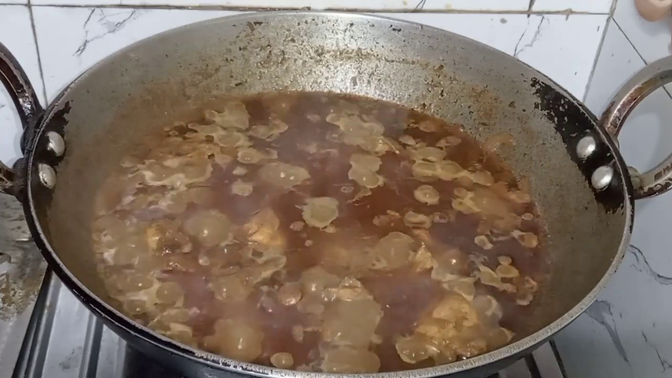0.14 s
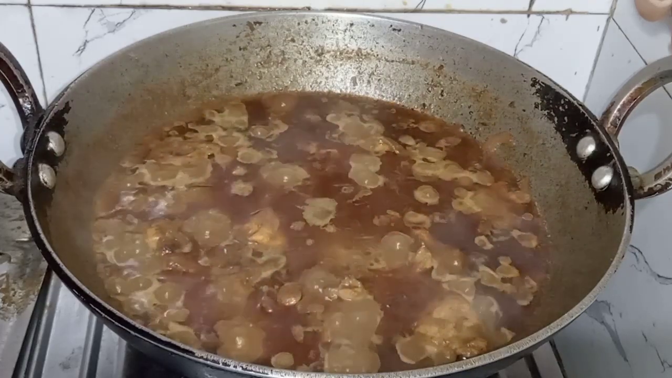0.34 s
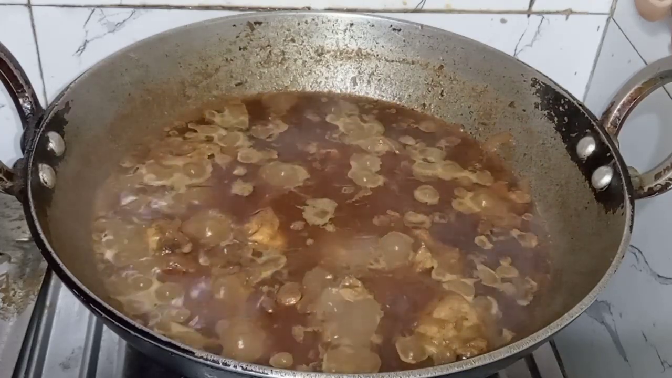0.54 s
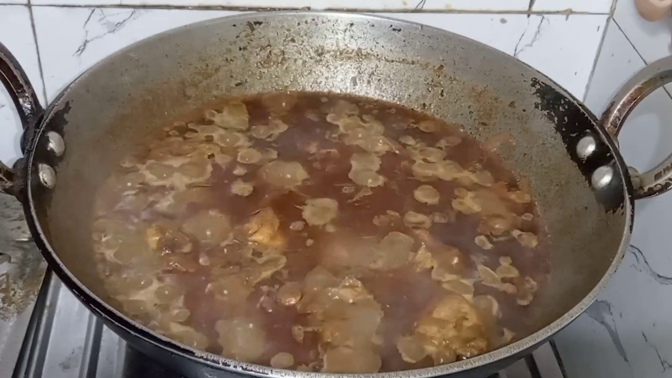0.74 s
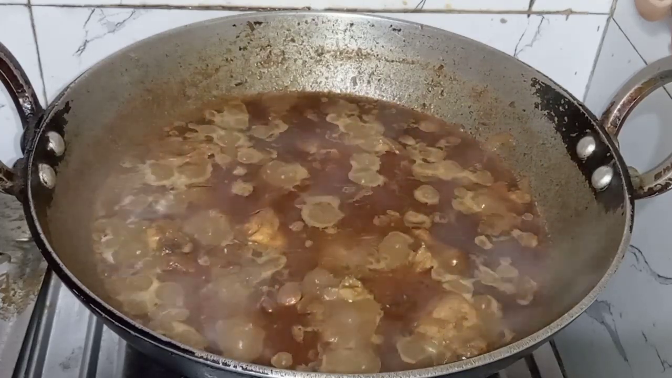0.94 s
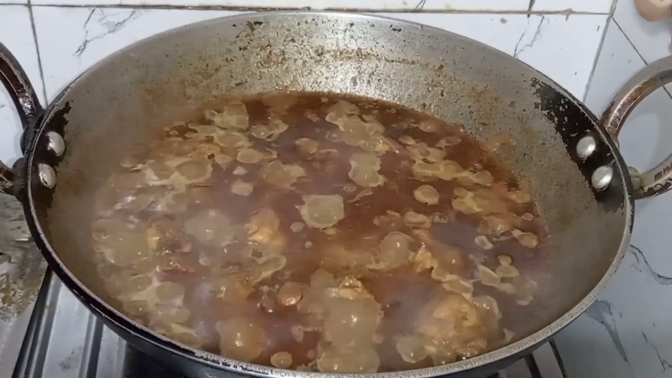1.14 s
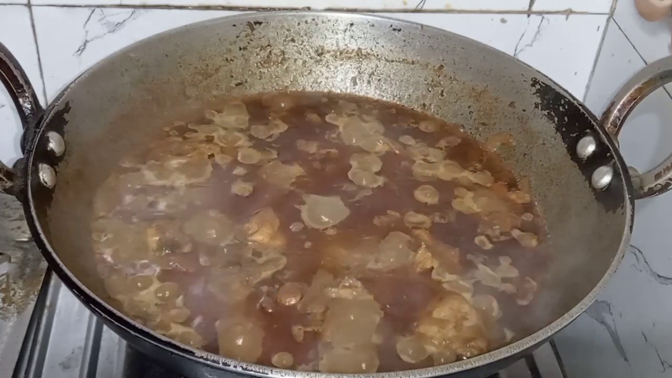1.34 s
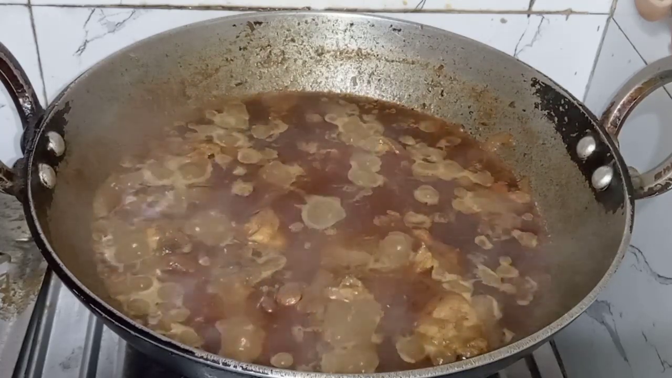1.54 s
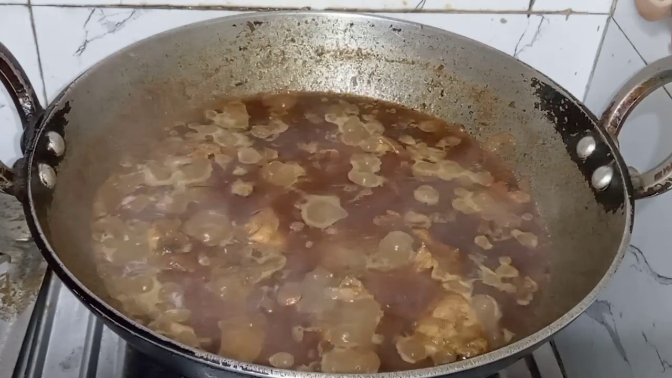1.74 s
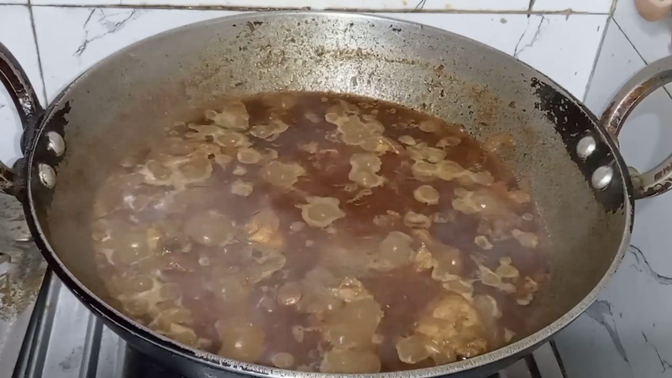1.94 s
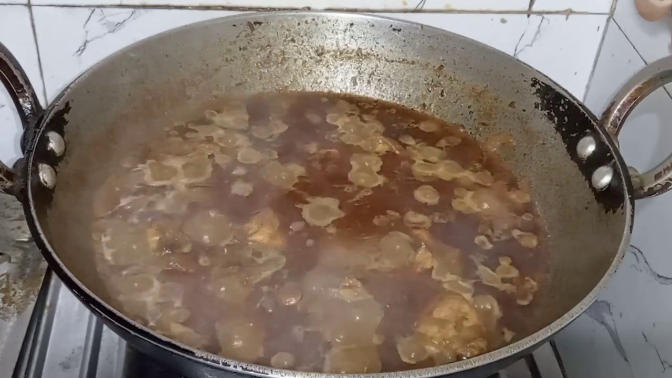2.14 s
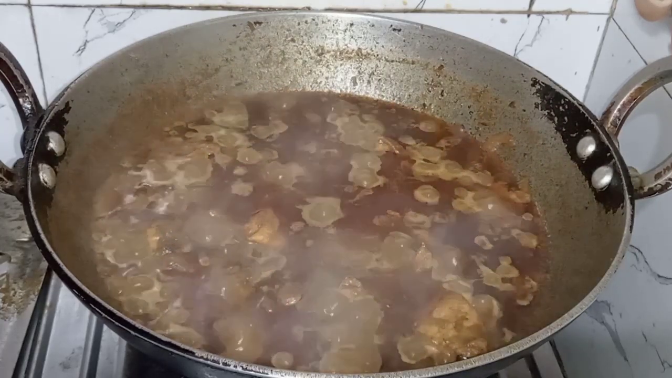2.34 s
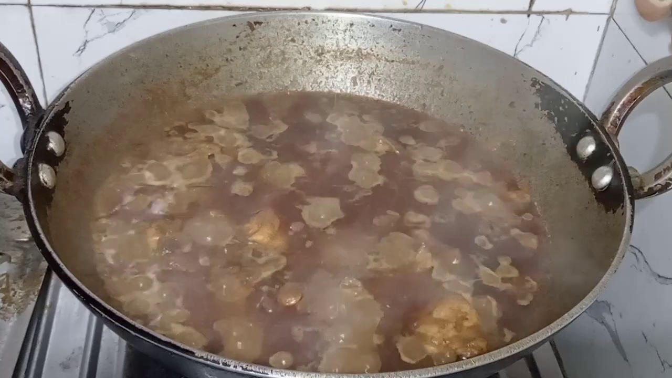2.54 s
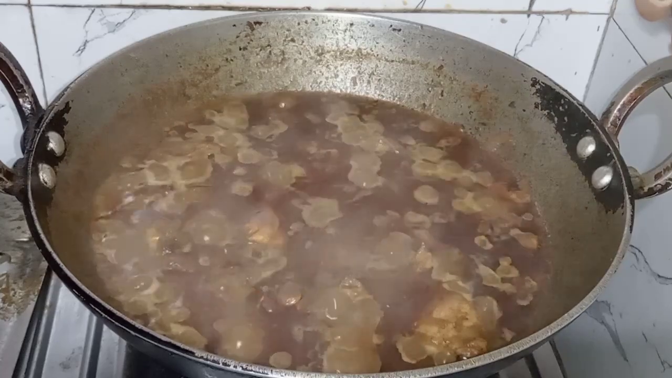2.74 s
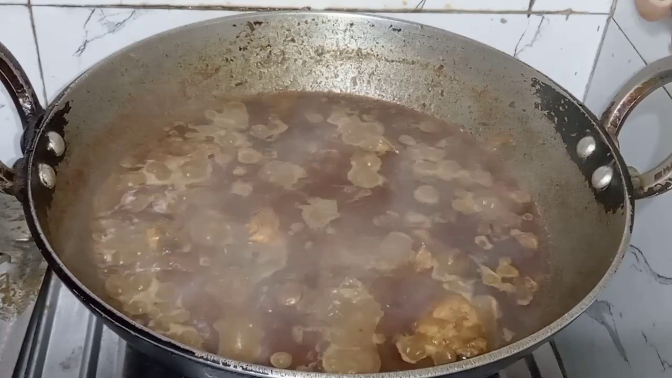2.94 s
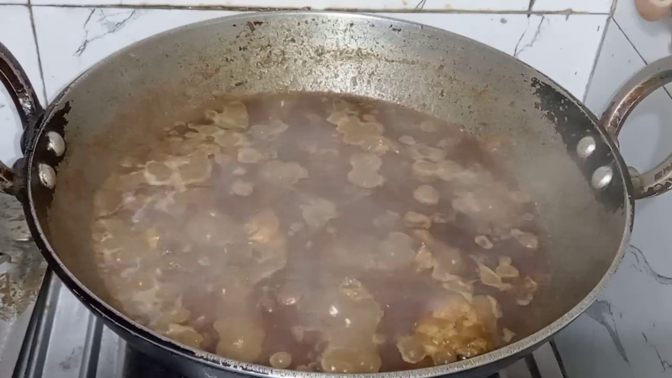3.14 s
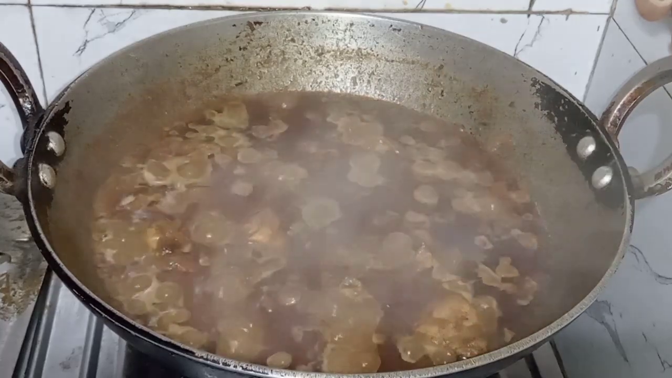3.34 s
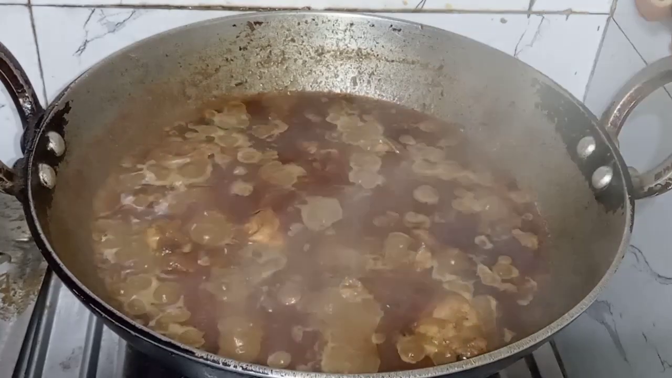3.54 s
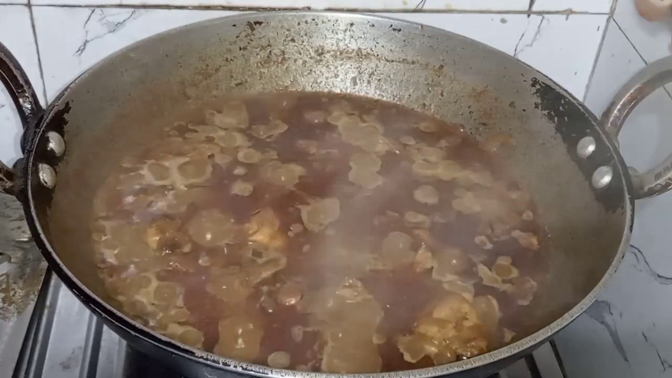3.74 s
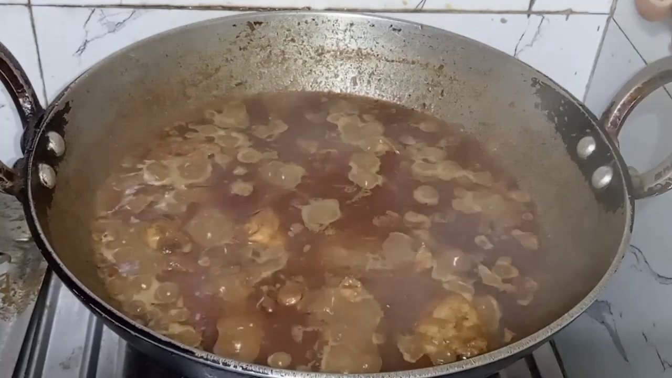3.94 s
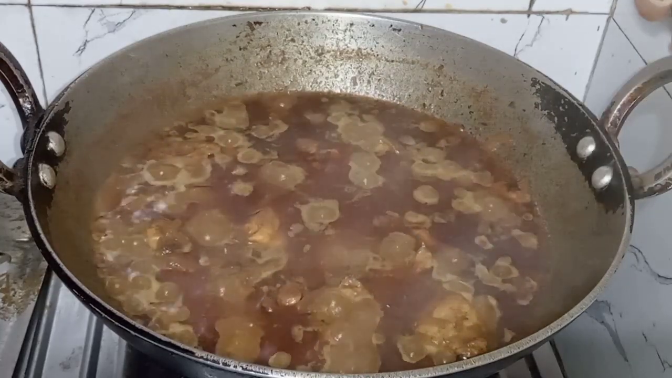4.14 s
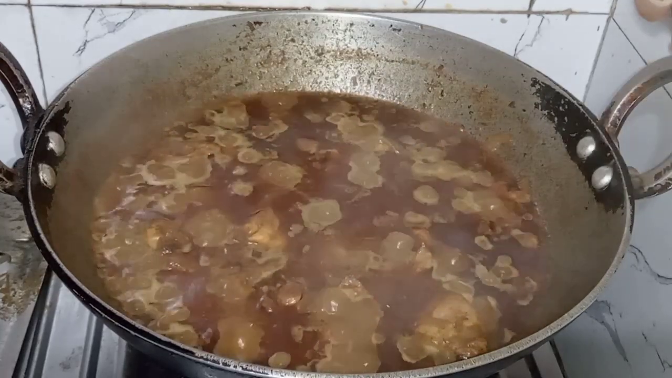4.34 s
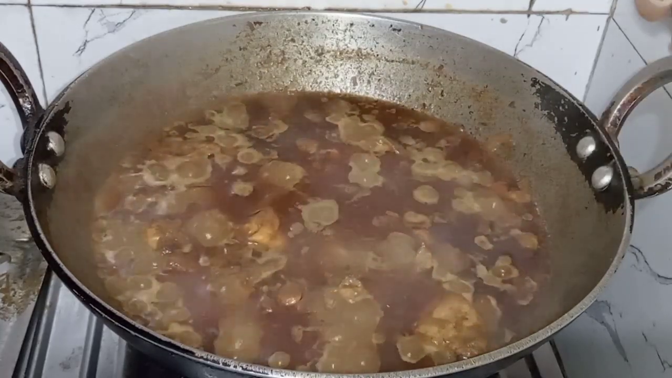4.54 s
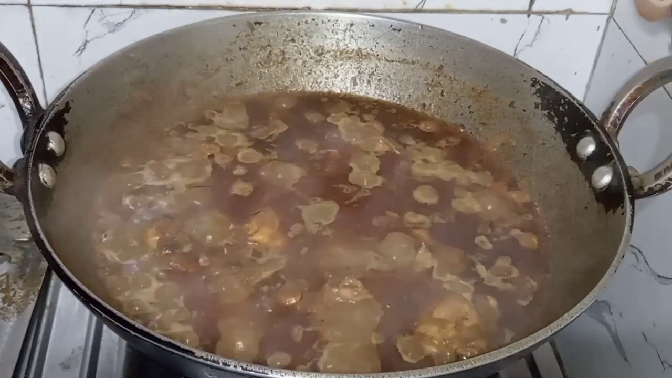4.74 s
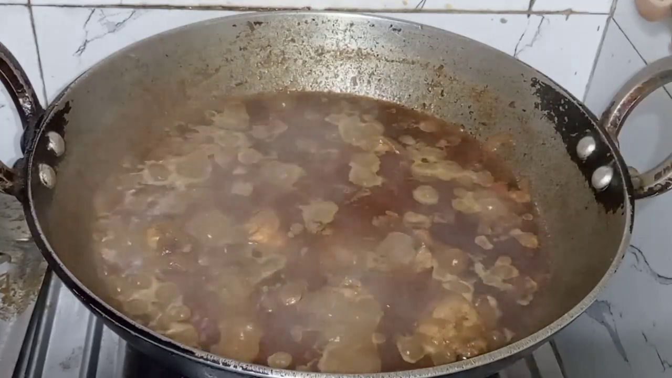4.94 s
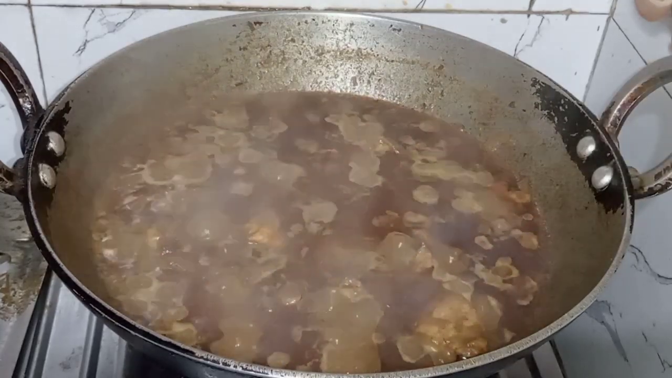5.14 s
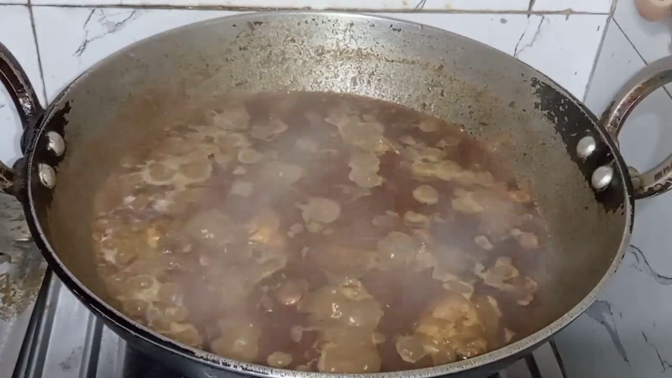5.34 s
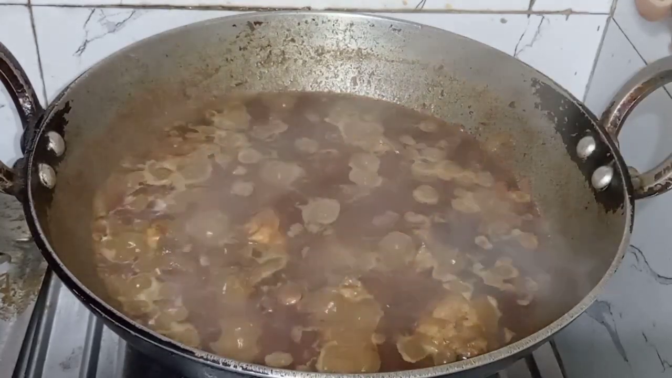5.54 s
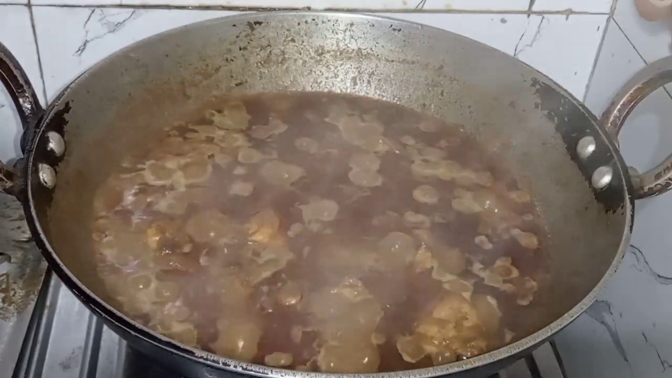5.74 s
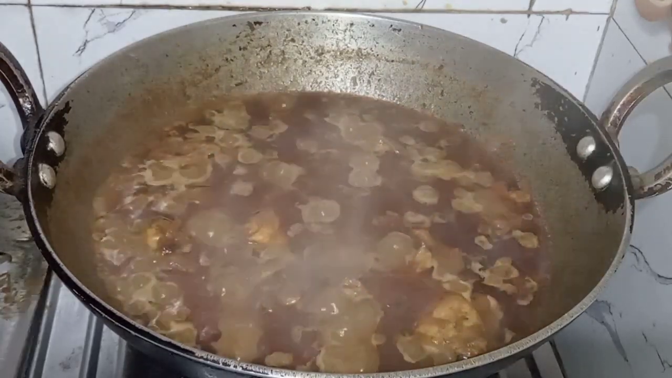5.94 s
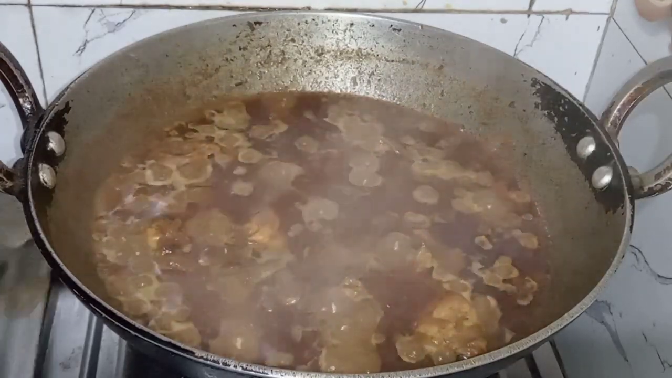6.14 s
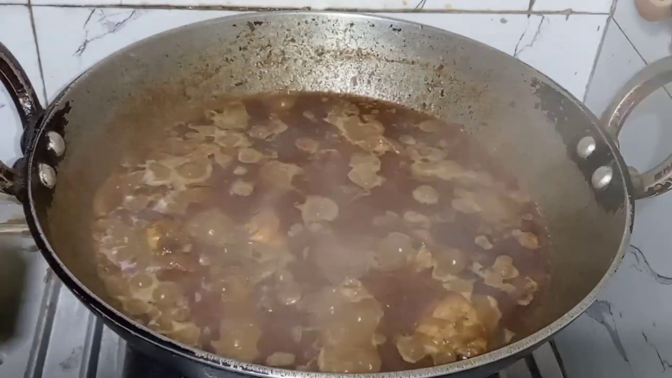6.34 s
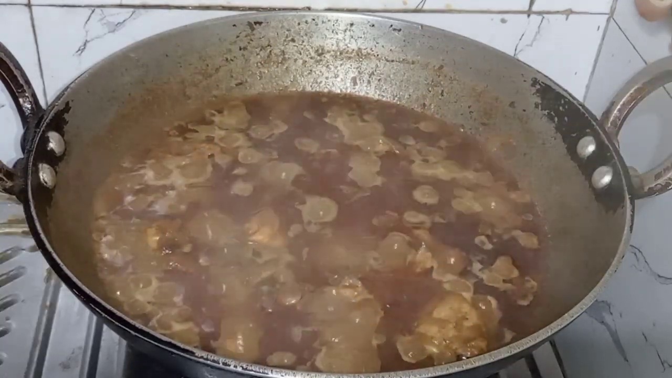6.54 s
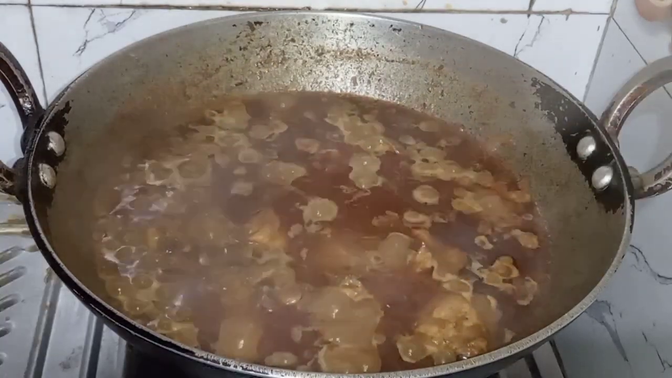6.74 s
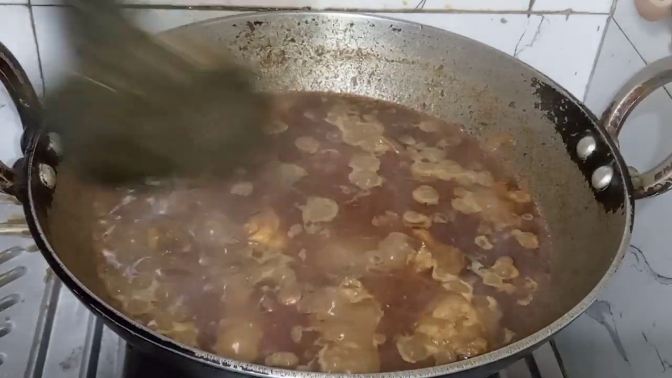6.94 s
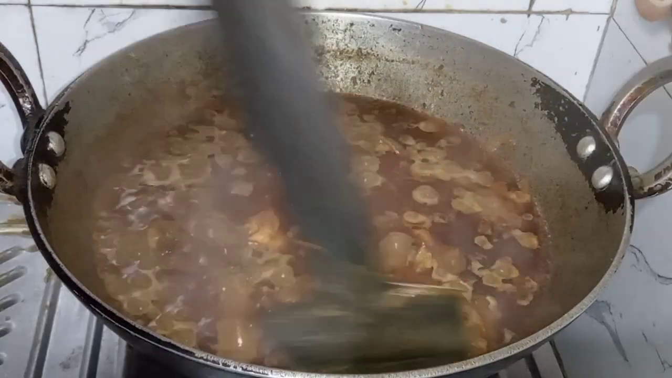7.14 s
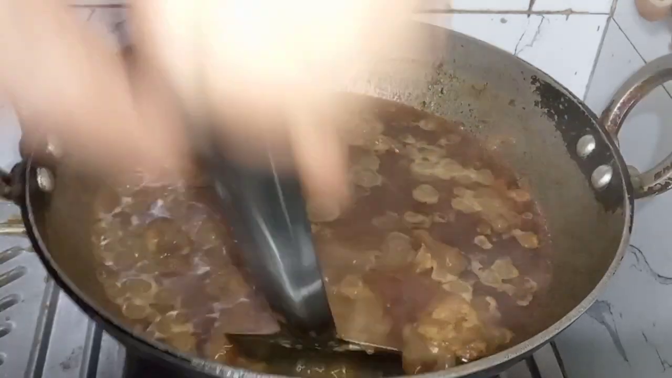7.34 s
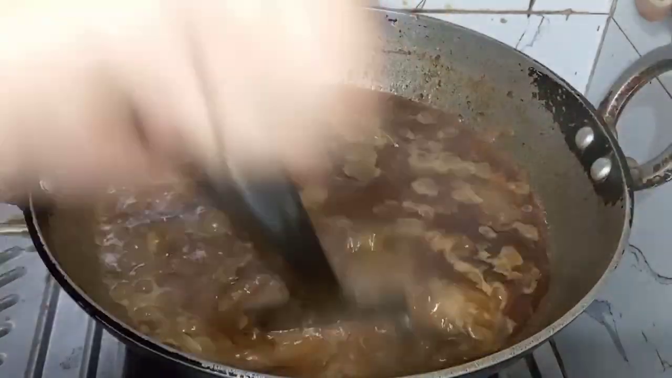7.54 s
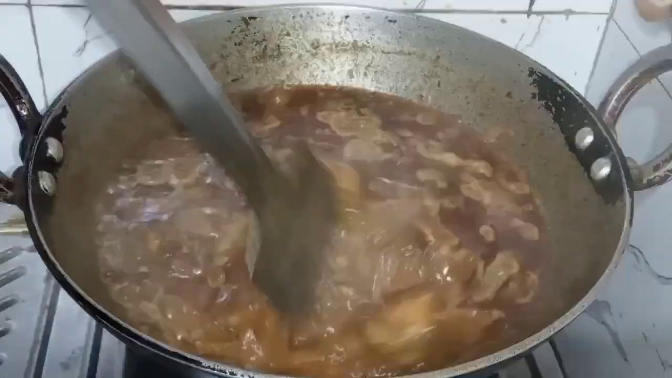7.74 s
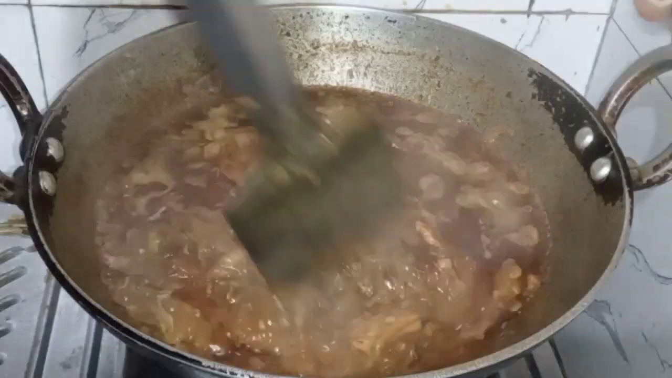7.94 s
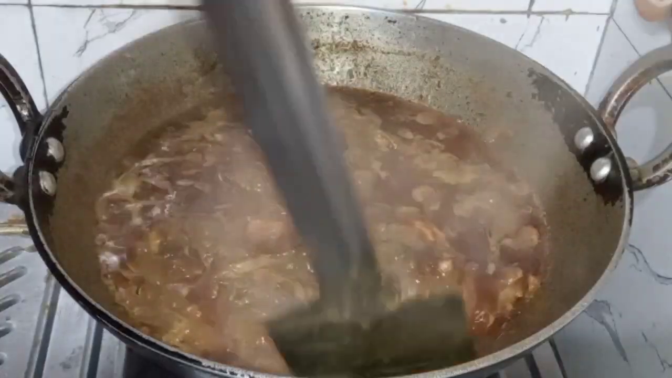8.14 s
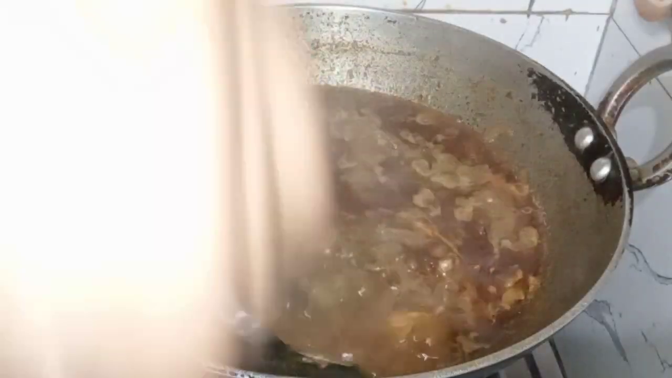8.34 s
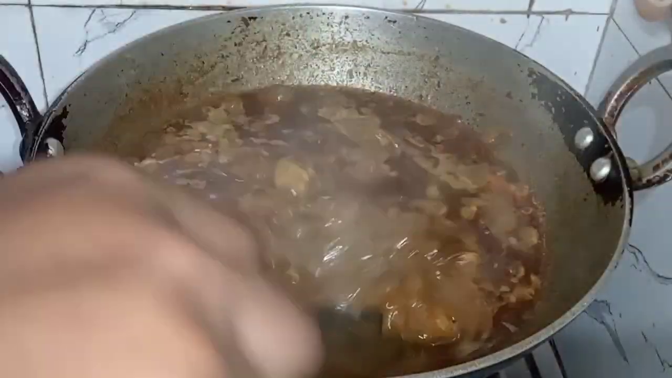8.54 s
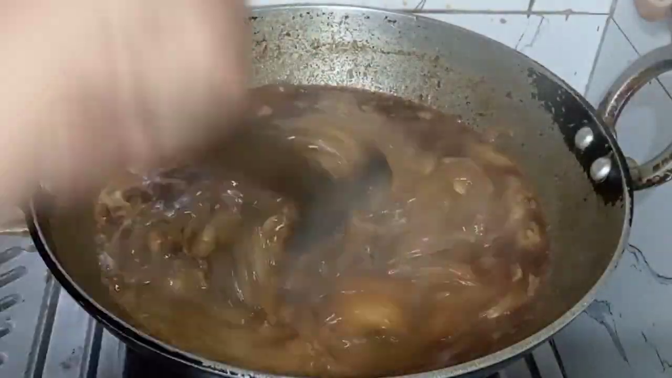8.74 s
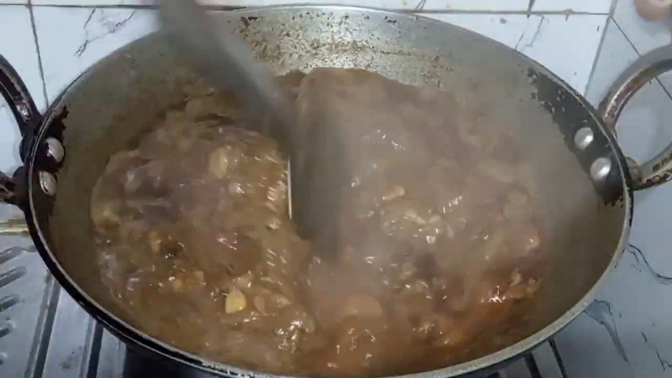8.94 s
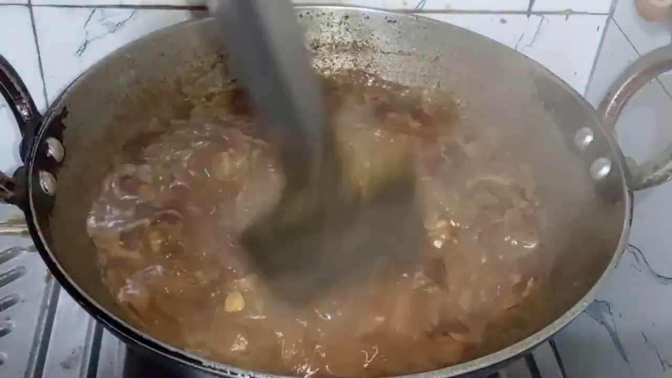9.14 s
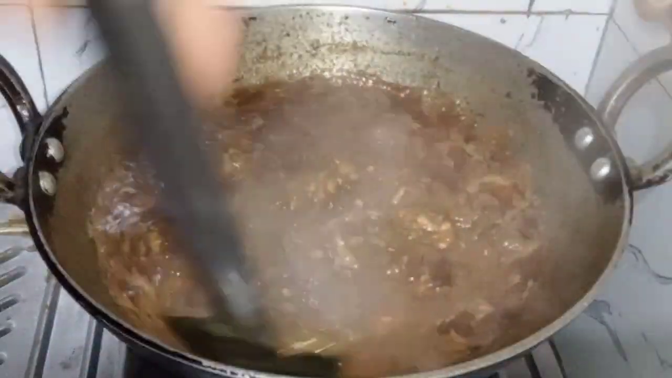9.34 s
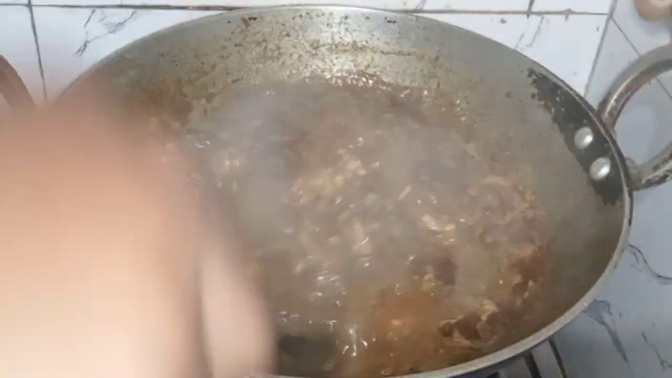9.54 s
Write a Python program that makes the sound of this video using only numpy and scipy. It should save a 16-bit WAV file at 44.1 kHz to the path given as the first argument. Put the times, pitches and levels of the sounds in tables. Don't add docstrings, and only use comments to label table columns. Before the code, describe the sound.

Thick gravy simmers with fizzing, popping bubbles over a low burner roar, a few knocks, then a metal spatula scrapes and sloshes through it.

```python
import sys
import numpy as np
from scipy import signal
from scipy.fft import rfft, irfft, next_fast_len
from scipy.io import wavfile
from scipy.ndimage import uniform_filter1d

SR = 44100
rng = np.random.default_rng(int(sys.argv[2]) if len(sys.argv) > 2 else 0)


def decibels_to_gain(level_db):
    exponent = np.asarray(level_db, float) / 20
    return 10 ** exponent


def wav_record(signal):
    frames = np.transpose(np.atleast_2d(signal))
    bounded = np.clip(frames, -1, 1)
    quanta = np.round(bounded * 32767).astype(np.int16)
    wavfile.write(sys.argv[1], SR, quanta)


N = 427769

# freq_hz [Hz], density_db [dB per Hz]
ROAR_SPECTRUM = [(25, -31), (48, -23.5), (62, -16.5), (95, 3.5), (130, -4), (220, -6.5), (330, -8),
                 (530, -9.5), (700, -14), (1200, -24), (1500, -21.5), (2300, -24), (2900, -15.5),
                 (5000, -73)]
# centre_s [s], lift_db [dB], half_length_s [s]
DRAUGHTS = [
    (6.13, 4, 0.23),
    (9.6, 5.5, 0.84),
]
# centre_s [s], lift_db [dB], half_length_s [s]
RUMBLE_GUSTS = [(.15, -8, .1), (1.3, 3, 0.1), (3.0, -22, 0.18), (3.4, 4, .12), (3.95, -6, .12),
                (4.4, 1, 0.13), (4.9, -6, 0.054), (5.3, 0, .08), (6.1, -2.5, 0.13), (6.7, 3.5, 0.28),
                (7.7, -12, 0.087), (9.1, -8.5, 0.17)]
# freq_hz [Hz], width_hz [Hz], lift_db [dB over surroundings]
PAN_RESONANCES = [(273.3, 23.5, 8), (819.7, 97, 15), (1090, 64, 18), (1460, 190, 10), (1717, 215, 7.5),
                  (2230, 54, 7), (2690, 38, 9), (3660, 270, -1)]

# freq_hz [Hz], density_db [dB per Hz]
FIZZ_SPECTRUM = [(1800, -38.5), (2400, -18.5), (2900, -15.5), (3300, -1.5), (4300, -8), (5900, 3),
                 (6800, 2), (7600, -5.5), (8500, -36)]
# start_s [s], peak_db [dB], pitch_hz [Hz]
TICKS = [(0.0138, -42, 6540), (0.0666, -45, 6270), (0.3741, -45, 5730), (0.3905, -38, 3700),
         (0.5356, -45, 4410), (0.7192, -47, 5050), (0.8249, -40.5, 6150), (1.066, -47, 3480),
         (1.2195, -41, 5100), (1.8651, -58, 6570), (2.114, -46, 3660), (2.1719, -48, 6600),
         (2.3275, -50, 3970), (2.6902, -47, 5770), (3.3702, -42, 5270), (3.4525, -48, 5100),
         (3.9459, -49, 4470), (4.1924, -45, 5430), (4.352, -42, 5770), (4.4951, -44, 6020),
         (4.6278, -43, 5480), (4.7266, -41, 6040), (4.8263, -45, 5400), (4.9939, -41, 5330),
         (5.4893, -40, 2880), (5.8949, -41, 5240), (6.0627, -43, 5860), (6.4761, -42, 6300),
         (6.8447, -41, 5800), (7.1166, -42, 5270), (7.128, -39, 6500), (7.138, -48, 3800),
         (0.043, -47, 5740), (0.101, -47, 6430), (0.189, -53, 4110), (0.2777, -47, 5330),
               (0.4728, -45, 5100), (0.6394, -47, 6160), (0.6918, -49, 6840), (0.9852, -47, 3480),
               (1.0216, -52, 5000), (2.2298, -48, 3670), (2.4069, -47, 4710), (2.807, -47, 4090),
               (3.5324, -44, 5930), (4.0594, -49, 4040), (4.133, -49, 5470), (4.2642, -45, 5610),
               (4.799, -49, 6060), (4.9034, -43, 5810), (4.9744, -53, 3600), (5.0719, -43, 5660),
               (5.1213, -46, 5630), (5.2273, -47, 6010), (5.2809, -46, 5870), (5.414, -49, 3830),
               (5.5358, -49, 5740), (5.6084, -46, 5650), (5.6344, -46, 4240), (6.0317, -48, 6300),
               (6.135, -42, 6350), (6.1938, -42, 5300), (6.395, -51, 6840), (6.4268, -46, 6090),
               (6.488, -43, 5320), (6.6403, -39.5, 6560), (6.9072, -50, 5480), (6.983, -46, 5800)]
# start_s [s], peak_db [dB], pitch_hz [Hz]
BLIPS = [(0.185, -40, 2160), (0.8949, -47, 1380), (1.0704, -38, 1460), (1.1272, -44, 2020),
         (1.426, -43.5, 2000), (1.626, -41, 1890), (2.7734, -44.5, 1450), (3.272, -44.5, 1560),
         (3.3796, -43, 1850), (3.46, -43, 1680), (4.128, -39, 1750), (4.688, -48, 1530),
         (4.8634, -38.5, 1670), (5.3009, -41.5, 1450), (5.6227, -44, 1750), (5.7437, -45, 1400),
         (5.9877, -44, 1390), (6.0561, -54, 1650), (6.766, -45, 1630), (6.9705, -44, 1430),
         (7.0636, -42, 1910),
         (0.0408, -47, 1560), (0.2994, -52, 1520), (0.623, -49, 1100), (1.2694, -53, 1500),
               (1.8851, -44, 1740), (2.2792, -49, 1610), (2.5538, -52, 1120), (2.9494, -54, 1550),
               (3.9594, -47, 1100), (4.02, -48, 1150), (4.1759, -48, 1400), (4.3984, -53, 1740),
               (4.7636, -46, 1340), (5.0549, -52, 1570), (5.199, -49, 1100), (5.4094, -51, 1630),
               (5.5857, -49, 1710), (5.8396, -53, 1130), (6.3744, -47, 1710), (6.6084, -51, 1170),
               (7.0494, -47, 1770)]
# centre_s [s], share [0-1], half_length_s [s]
LULLS = [(1.5, 0.05, .1), (1.85, 0.5, .08), (2.5, 0.06, 0.19), (3.0, 0.34, 0.25), (3.45, 0, 0.11),
         (4.14, 0.47, 0.061), (4.3, .7, 0.056), (4.6, 0.5, 0.23), (4.92, 0.3, 0.072), (5.12, 0.5, 0.081),
         (5.28, 0.4, .06), (5.75, 0.27, 0.13), (6.05, 0.04, 0.054), (6.5, 0.2, .12), (6.8, 0.44, 0.12)]

# start_s [s], rattle_db [dB], rise_s [s], rattle_length_s [s]
KNOCKS = [
    (1.691, -42, 0.0036, 0.048),
    (1.997, -45, 0.0045, 0.062),
    (3.559, -27.5, 0.0088, 0.073),
    (6.222, -33, 0.002, 0.0074),
    (7.162, -27.5, 0.0016, 0.008),
    (9.279, -38, 0.00051, 0.0011),
]
# crack_db [dB re rattle], ring_db [dB re rattle], t60_s [s], looseness [0-1]
STRUCK_THINGS = [
    (11, 9, 0.77, 0.6),
    (0, 5.5, 0.26, 0.46),
    (-4.5, -0.3, 0.61, 0.45),
    (1, 4, 0.48, 0.36),
    (-4, 0, 0.61, 0.57),
    (7.5, 5.5, 0.85, 0.2),
]
# freq_hz [Hz], density_db [dB per Hz]
KNOCK_SPECTRA = [
    [(80, -18), (330, -7.5), (900, -7.5), (1250, -20), (1700, -12), (2680, -15.5), (2850, -25),
     (7500, -33.5)],
    [(100, 11), (300, -5), (950, -2), (1600, -12.5), (3000, -23), (7500, -25)],
    [(100, -16), (420, -14), (1030, 0.5), (1740, -7), (2500, -4.5), (4400, -12.5), (5000, -22.5),
     (8000, -36)],
    [(100, -30), (430, -6), (850, -14.5), (1300, -15.5), (3500, -16.5), (8000, -24.5)],
    [(200, -18), (700, -22), (1700, -15), (3400, -15.5), (5300, -5), (7500, -10.5), (8600, -23)],
    [(200, 1), (400, -12), (1000, -9), (1800, -13), (4000, -8.5), (7200, -9.5), (8600, -27)],
]
# freq_hz [Hz], level_db [dB], t60_s [s]
KITCHEN_MODES = [
    [(117, -17, 1.2), (323, -5, .22), (408, -14, .4), (482, -7, .15), (590, -12, .2), (703, -12, .25),
     (949, -1, .22), (955, -12, .7), (1040, -15, .2), (1750, -15, .2), (2520, -13, .07)],
    [(119, 3, 1.3), (107, -7, .7), (190, -7, .6), (320, -13, .3), (493, -10, .3), (544, -15, .3)],
    [(412, -14, .85), (440, -11, .5), (542, -14, .7), (845, -13, .5), (980, -9, .3), (1058, -8, 1.0),
     (1080, -9, 1.1), (1142, -9, .7), (322, -15, .9), (1590, -11, .3), (2412, -4, .3), (2433, -4, .28),
     (2422, -18, 1.2), (2885, -14, .4), (4506, -17, .23)],
]
# freq_hz [Hz], level_db [dB], t60_s [s]
UTENSIL_MODES = [
    [(182, -12, .3), (256, -8, .35), (338, -9, .25), (420, -6, .25), (2940, -13, .2), (805, 0, .2),
     (900, 3, .13), (2090, -12, .2), (2600, -9, .1), (3450, -10, .12), (4400, -15, .2), (4840, -11, .15),
     (6000, -17, .25)],
    [(1190, -10, .12), (1631, -17, .15), (2110, -14, .1), (2700, -8, .06), (4646, -12, .2),
     (4980, -10, .19), (5398, -6, .17), (5424, -10, .35), (5593, -12, .25), (6261, -6, .2), (6869, -12, .2)],
    [(1090, -8, .2), (2492, -3, .1), (4800, -3, .08), (5500, -9, .08), (6500, -8, .12), (7160, -1, .12)],
]
# start_s [s], level_db [dB], rise_s [s], pitch_hz [Hz], t60_s [s]
BOUNCES = [(3.596, -37, 0.0086, 5550, 0.3), (1.733, -42, 0.0089, 925, 0.15),
           (7.167, -23, .001, 5560, 0.033), (3.568, -31, .001, 2380, 0.041), (9.3, -41.5, .004, 1020, 0.15),
           (9.316, -44, .003, 4570, .06), (6.053, -50, 0.0054, 870, 0.11), (6.056, -49, .005, 260, .15),
           (6.085, -45, .005, 248, 0.11), (6.133, -55.5, .005, 930, 0.13), (6.135, -44, 0.0065, 246, 0.16),
           (6.163, -56, .004, 910, .1), (6.198, -48, .004, 910, 0.084), (7.28, -44, .004, 583, 0.07),
           (7.462, -38.5, .006, 260, 0.16), (8.897, -40.5, 0.0022, 5200, 0.093)]

# start_s [s], length_s [s], scrape_db [dB], sizzle_db [dB], sizzle_length_s [s]
STROKES = [
    (7.296, .4, -43, -43.5, .25),
    (8.244, .5, -42, -45, .48),
    (9.342, .4, -43, -45, .4),
]
# start_s [s], knock_db [dB], splash_db [dB re knock], splash_hz [Hz], t60_s [s]
CATCHES = [(7.391, -32, -1.5, 2930, 0.12), (7.644, -30.5, -4.5, 6360, 0.052),
           (7.729, -35.5, -3.5, 3080, 0.43), (7.794, -33, -3.5, 3800, 0.17), (7.871, -33.5, -4, 3760, 0.14),
           (7.908, -37, 1.5, 3700, 0.094), (8.009, -58, 22, 6700, 0.067), (7.791, -59, 19, 6600, .1),
           (7.996, -39, -4, 3000, .06), (8.008, -32, 0.5, 3580, 0.12), (7.325, -36.5, -14, 2500, 0.12),
           (8.314, -30.5, -20, 2400, .1), (8.365, -30, -18, 3000, .06), (8.585, -29, -11, 3000, 0.099),
           (8.084, -42, 0, 5000, 0.041), (8.139, -22.5, -9, 2870, 0.038), (8.157, -30.5, -5.5, 2840, 0.12),
           (8.27, -32.5, -22, 6400, 0.067), (8.381, -18.5, -21, 5250, 0.089), (8.403, -34, -26, 2670, 0.1),
           (8.504, -26.5, -11, 4350, 0.063), (8.604, -24, -12, 3010, 0.15),
           (8.752, -54.5, 24.5, 5500, 0.05), (8.883, -45.5, 12.5, 3380, 0.078),
           (8.93, -29, -8.5, 3270, 0.04), (9.06, -33.5, -1.5, 3300, 0.12), (9.166, -51, 3, 3100, 0.098),
           (9.177, -31.5, -6, 3520, 0.14), (9.226, -33.5, -7, 3200, 0.13), (9.453, -31, -2, 3520, 0.12)]
# freq_hz [Hz], density_db [dB per Hz]
EDGE_SPECTRUM = [(500, -24), (900, 0.5), (1400, -4), (1850, 0), (2400, -4.5), (3200, -29)]
# freq_hz [Hz], density_db [dB per Hz]
SLIP_SPECTRUM = [(450, -24), (700, 8.5), (1650, 3.5), (1810, 12), (1980, 8.0), (2300, 10.0), (3000, -47.0)]
# freq_hz [Hz], density_db [dB per Hz]
SIZZLE_SPECTRUM = [(1180, -33.5), (2000, -23), (2430, -9.5), (3790, -5.5), (5000, -11.5), (6490, -5.5),
                   (7540, -14.5), (8460, -23.5), (11000, -73.5), (18600, -120)]
# freq_hz [Hz], density_db [dB per Hz]
SLOSH_SPECTRUM = [(29, -51), (50, -32.5), (114, -5), (248, 0), (324, -7.5), (613, -5.5), (800, -13),
                  (1040, -18.5), (1760, -120)]
# centre_s [s], lift_db [dB], half_length_s [s]
SURGES = [
    (7.48, 11, 0.13),
    (8.18, 11.5, 0.047),
    (8.4, 10.5, 0.16),
    (8.6, -11.5, 0.18),
    (9.0, 5, 0.39),
    (9.6, 7, 0.17),
]


def evened(x):
    return x / np.sqrt(np.mean(x ** 2) + 1e-20)


def add(mix, start_s, sound):
    part = mix[round(start_s * SR):][:len(sound)]
    part += sound[:len(part)]


def coloured(x, spectrum, pan=0.):
    hz = abs(np.fft.fftfreq(8192, 1 / SR))
    points_hz, points_db = np.transpose(spectrum)
    db = np.interp(np.log(hz + 1), np.log(points_hz), points_db, left=-60, right=-80)
    for mode_hz, width_hz, lift_db in PAN_RESONANCES:
        db = db + pan * lift_db / (1 + (2 * (hz - mode_hz) / width_hz) ** 2)
    log_gain = np.log(decibels_to_gain(np.maximum(db, -100)))
    response = np.exp(np.conj(signal.hilbert(log_gain)))
    taps = np.fft.ifft(response).real[:4096]
    return evened(signal.oaconvolve(x, taps)[:len(x)])


def resonate(x, hz, width_hz):
    turn = np.exp(2j * np.pi * np.cumsum(hz * np.ones(len(x))) / SR)
    pole = np.exp(-np.pi * width_hz / SR)
    smooth = signal.lfilter([1 - pole], [1, -pole], x / turn)
    return 2 * (turn * smooth).real


def wander(rate_hz, size=N):
    padded = next_fast_len(size)
    hz = np.fft.rfftfreq(padded, 1 / SR)
    spectrum = rfft(rng.standard_normal(padded)) / (1 + (hz / rate_hz) ** 2)
    return evened(irfft(spectrum, padded)[:size])


def clicks(per_s, spread_db):
    size = decibels_to_gain(spread_db * np.minimum(rng.exponential(1, N), 4))
    sign = np.sign(rng.random(N) - .5)
    return size * sign * (rng.random(N) < per_s / SR)


def patchy(x, patch_db, frames=16, bins=8):
    z = signal.stft(x, nperseg=512, noverlap=384)[2]
    field = rng.standard_normal(z.shape)
    for _ in range(2):
        field = uniform_filter1d(field, bins, 0, mode="wrap")
        field = uniform_filter1d(field, frames, 1, mode="wrap")
    z = z * decibels_to_gain(patch_db * evened(field))
    return evened(signal.istft(z, nperseg=512, noverlap=384)[1][:N])


def swells(rows):
    t = np.arange(N) / SR
    return sum(lift * np.exp(-((t - centre_s) / half_s) ** 2) for centre_s, lift, half_s in rows)


def surroundings(x, t60_s, wet_db, gap_s=0.0022):
    t = np.arange(round(.25 * SR)) / SR
    tail = rng.standard_normal(len(t)) * decibels_to_gain(-60 * t / t60_s) * (t > gap_s)
    return x + decibels_to_gain(wet_db) * signal.oaconvolve(x, tail / np.linalg.norm(tail))[:N]


def burner():
    roar = coloured(rng.standard_normal(N) * decibels_to_gain(1.5 * wander(34)), ROAR_SPECTRUM, pan=0.87)
    roar = patchy(roar, patch_db=1.5)
    rumble = resonate(roar, hz=100, width_hz=91)
    roar = roar + (decibels_to_gain(swells(RUMBLE_GUSTS)) - 1) * rumble
    hum_hz, hum_width_hz, hum_db, roar_db = 98.4, 7.6, -70, -54
    hum = resonate(rng.standard_normal(N), hum_hz, hum_width_hz)
    hum = evened(resonate(hum, hum_hz, hum_width_hz))
    return decibels_to_gain(roar_db + swells(DRAUGHTS)) * roar + decibels_to_gain(hum_db) * hum


def bubble(hz, turns, glide):
    u = np.arange(round(5 * turns / hz * SR)) / SR * hz / turns
    tone = np.sin(2 * np.pi * turns * (u + glide * u ** 2 / 2))
    return tone * np.exp(-u) * (1 - np.exp(-8 * u))


def swarm(low_hz, high_hz, per_s, spread_db, turns, glide, count=9):
    train = clicks(per_s, spread_db)
    size = rng.integers(0, count, N)
    out = np.zeros(N)
    for k, hz in enumerate(np.geomspace(low_hz, high_hz, count)):
        out += signal.oaconvolve(train * (size == k), bubble(hz, turns, glide))[:N]
    return evened(out)


def simmer():
    crackle = evened(clicks(1200 * decibels_to_gain(5.1 * wander(35)), spread_db=4.0))
    fizz = patchy(coloured(crackle + 0.57 * rng.standard_normal(N), FIZZ_SPECTRUM), patch_db=1.5)
    small = decibels_to_gain(-2.5) * swarm(3600, 6900, per_s=300, spread_db=2.6, turns=3.2, glide=.02)
    middle = decibels_to_gain(-1.1) * swarm(1000, 2300, per_s=260, spread_db=2.6, turns=4.5, glide=.04)
    out = decibels_to_gain(-62) * (fizz + small + middle)
    for start_s, peak_db, hz in TICKS:
        add(out, start_s, decibels_to_gain(peak_db + 6.0) * bubble(hz, turns=3.6, glide=0.022))
    for start_s, peak_db, hz in BLIPS:
        add(out, start_s, decibels_to_gain(peak_db - 0.5) * bubble(hz, turns=6.8, glide=0.016))
    return surroundings(out, t60_s=.06, wet_db=-8)


def pot():
    out = burner() + simmer()
    out = out - np.clip(swells(LULLS), 0, .9) * resonate(out, hz=2800, width_hz=1350)
    return out - 0.7 * resonate(out, hz=2830, width_hz=400)


def knock(rattle_db, rise_s, length_s, crack_db, ring_db, t60_s, looseness, spectrum, modes):
    t = np.arange(round(.8 * SR)) / SR
    size = len(t)
    onset = np.clip(t / max(rise_s, 1e-4), 0, 1)
    after_s = np.maximum(t - length_s, 0)
    noise = coloured(rng.standard_normal(size), spectrum)
    bass = signal.sosfilt(signal.butter(1, 1500, fs=SR, output="sos"), noise)
    rattle = bass * decibels_to_gain(-60 * after_s / t60_s) + (noise - bass) * decibels_to_gain(-60 * after_s / (0.29 * t60_s))
    rattle = rattle * decibels_to_gain(2.5 * wander(90, size))
    crack = noise * decibels_to_gain(crack_db - 60 * np.maximum(t - rise_s, 0) / 0.02)
    ring = np.zeros(size)
    settle_s = 0.074
    waver = looseness * (.3 + .7 * np.exp(-t / settle_s))
    for hz, db, ring_s in modes:
        strength = decibels_to_gain(3.5 * waver * wander(16, size))
        phase = waver * wander(16, size) + 2 * np.pi * rng.random()
        decay = decibels_to_gain(db - 60 * np.maximum(t - 0.9 * length_s, 0) / ring_s)
        ring += decay * strength * np.cos(2 * np.pi * hz * t + phase)
    return onset * decibels_to_gain(rattle_db) * (crack + rattle + decibels_to_gain(ring_db) * ring)


def burst(db, rise_s, spectrum, t60_s, pan=0.):
    t = np.arange(round(.3 * SR)) / SR
    noise = coloured(rng.standard_normal(len(t)), spectrum, pan)
    decay = decibels_to_gain(db - 60 * np.maximum(t - rise_s, 0) / max(t60_s, .005))
    return decay * noise * np.clip(t / max(rise_s, 1e-3), 0, 1)


def knocks():
    out = np.zeros(N)
    all_modes = KITCHEN_MODES + UTENSIL_MODES
    for (start_s, *blow), thing, spectrum, modes in zip(KNOCKS, STRUCK_THINGS, KNOCK_SPECTRA, all_modes):
        add(out, start_s, knock(*blow, *thing, spectrum, modes))
    for start_s, db, rise_s, hz, t60_s in BOUNCES:
        spectrum = [(.75 * hz, -15), (hz, 0), (1.22 * hz, -12), (1.5 * hz, -30)]
        add(out, start_s, burst(db, rise_s, spectrum, t60_s))
    return surroundings(out, t60_s=.2, wet_db=-12, gap_s=.004)


def stroke_power(start_s, length_s, db, rise_s, first_db, fall_db_per_s):
    u = np.arange(N) / SR - start_s
    growth_db = first_db * np.clip(1 - u / rise_s, 0, 1)
    fall_db = fall_db_per_s * np.maximum(u - length_s, 0)
    return decibels_to_gain(2 * (db + growth_db - fall_db)) * np.clip(u / 0.017, 0, 1)


def strokes():
    t = np.arange(N) / SR
    rest_scrape_db, rest_sizzle_db = -65.5, -63.5
    hollow_top_hz, hollow_low_hz, deepen_s = 2120, 834, 0.47
    scrape, sizzle, depth = decibels_to_gain(2 * rest_scrape_db), decibels_to_gain(2 * rest_sizzle_db), np.ones(N)
    for start_s, length_s, scrape_db, sizzle_db, bare_s in STROKES:
        scrape = scrape + stroke_power(start_s, length_s, scrape_db, 0.16, -14.5, fall_db_per_s=58)
        sizzle = sizzle + stroke_power(start_s, bare_s, sizzle_db, 0.18, -13, fall_db_per_s=57.5)
        depth = np.where(t > start_s, np.clip((t - start_s) / deepen_s, 0, 1) ** 0.98, depth)
    hollow_hz = hollow_top_hz + (hollow_low_hz - hollow_top_hz) * depth
    return np.sqrt(scrape), np.sqrt(sizzle), hollow_hz


def spatula():
    scrape_gain, sizzle_gain, hollow_hz = strokes()
    slips = evened(clicks(2500 * decibels_to_gain(3.4 * wander(46)), spread_db=1.0)) + 0.4 * rng.standard_normal(N)
    body = coloured(slips, SLIP_SPECTRUM, pan=0.56)
    hollow = evened(resonate(resonate(body, hollow_hz, 900), hollow_hz, 950))
    scrape = patchy(.5 * body + hollow, patch_db=1.4)
    spits = evened(clicks(1800 * decibels_to_gain(3.0 * wander(40)), spread_db=3.5)) + .8 * rng.standard_normal(N)
    sizzle = patchy(coloured(spits, SIZZLE_SPECTRUM, pan=.8), patch_db=1.3)
    slosh = coloured(rng.standard_normal(N) * decibels_to_gain(2.0 * wander(14)), SLOSH_SPECTRUM, pan=.8)
    slosh_gain = decibels_to_gain(-58 + swells(SURGES))
    enter_s = 7.25
    inside = np.clip((np.arange(N) / SR - enter_s) / 0.012, 0, 1)
    out = inside * (scrape_gain * scrape + sizzle_gain * sizzle + slosh_gain * slosh)
    for start_s, db, splash_db, hz, t60_s in CATCHES:
        splash_spectrum = [(.45 * hz, -25), (.8 * hz, -3), (hz, 0), (1.3 * hz, -4), (2.2 * hz, -20)]
        contact = burst(db - 11.0, 0.0028, EDGE_SPECTRUM, t60_s, pan=0.75)
        splash = burst(db - 9.5 + splash_db, 0.0065, splash_spectrum, t60_s)
        add(out, start_s, contact + splash)
    return surroundings(out, t60_s=0.08, wet_db=-7)


def scene():
    return (pot() + knocks() + spatula())[None]


def low_pass(x):
    return signal.sosfilt(signal.butter(12, 15500, fs=SR, output="sos"), x)


def record(dry):
    edge_hz, width_hz, hiss_db = 8370, 950, -96
    points_hz = [0, edge_hz - width_hz, edge_hz, edge_hz + .45 * width_hz, SR / 2]
    limit = signal.firwin2(1023, points_hz, decibels_to_gain([0, 0, -24, -70, -90]), fs=SR, window=("kaiser", 8))
    x = signal.oaconvolve(dry, limit[None], "same")
    highpass = signal.butter(8, 15500, fs=SR, output="sos")
    hiss = signal.sosfilt(highpass, rng.standard_normal(x.shape))
    return low_pass(x + decibels_to_gain(hiss_db) * hiss)


dry = scene()
out = record(dry)
wav_record(out)
```